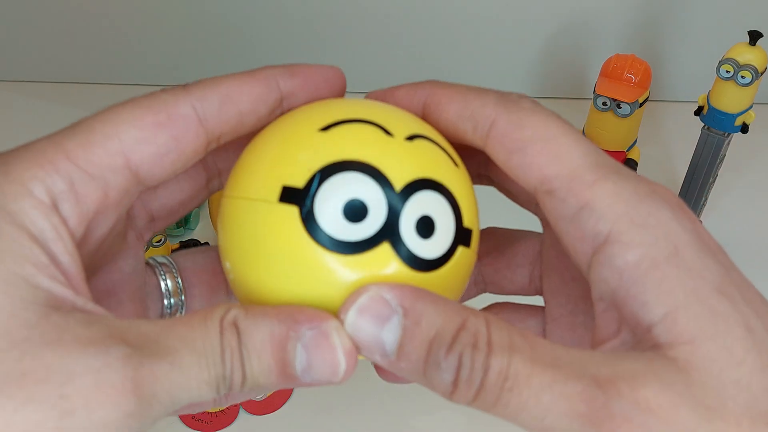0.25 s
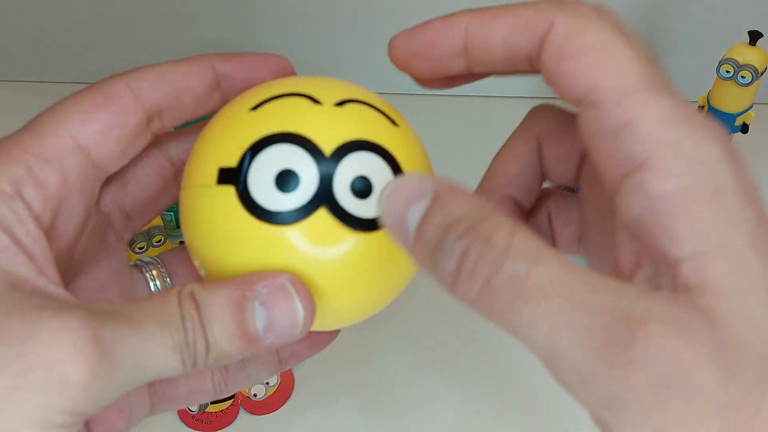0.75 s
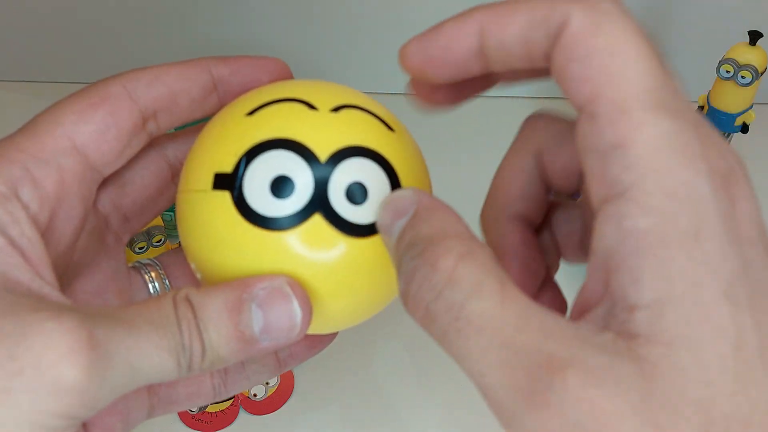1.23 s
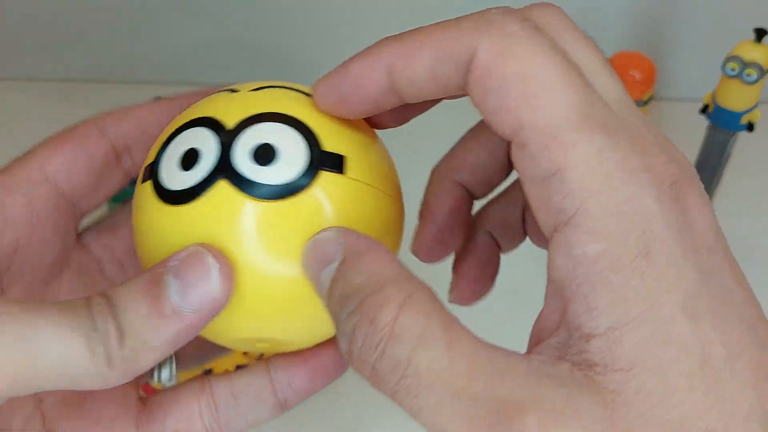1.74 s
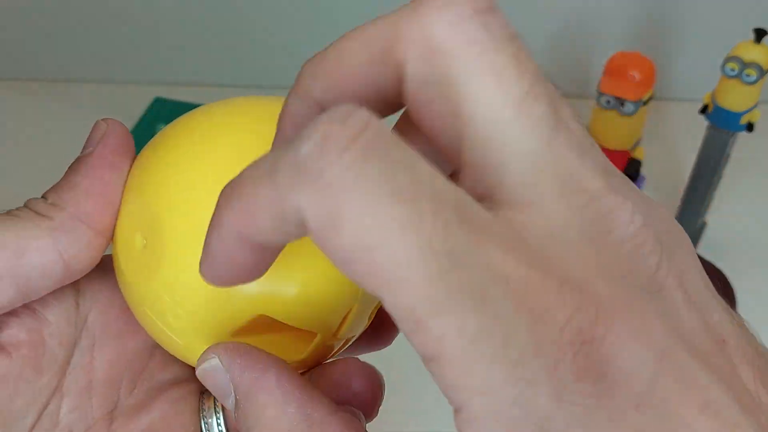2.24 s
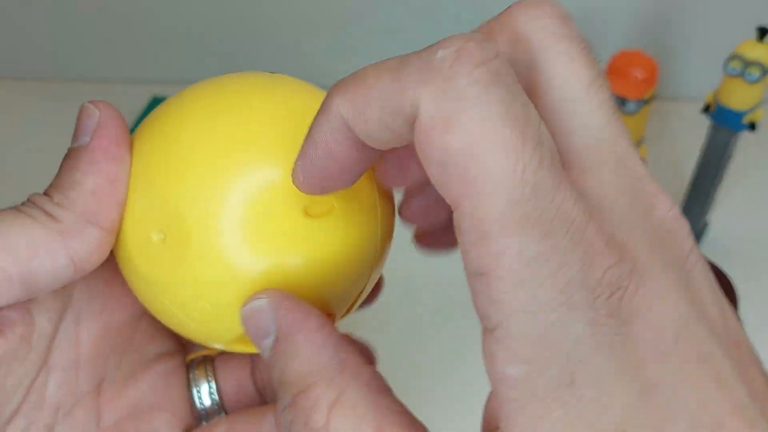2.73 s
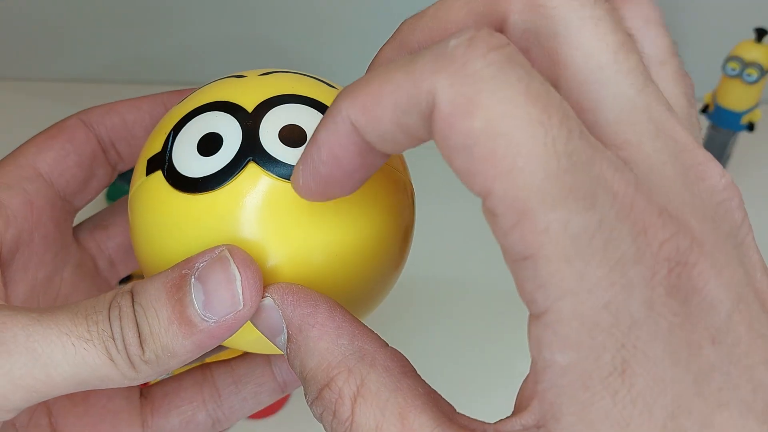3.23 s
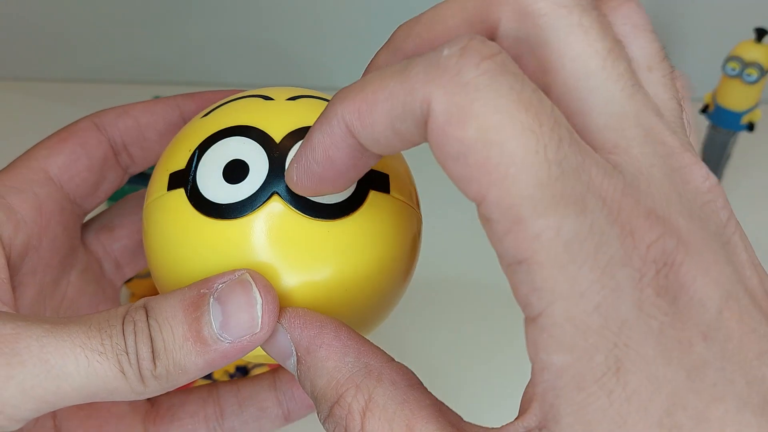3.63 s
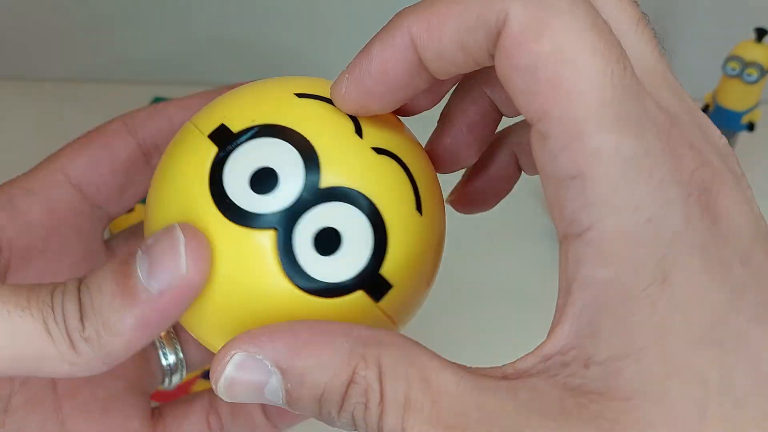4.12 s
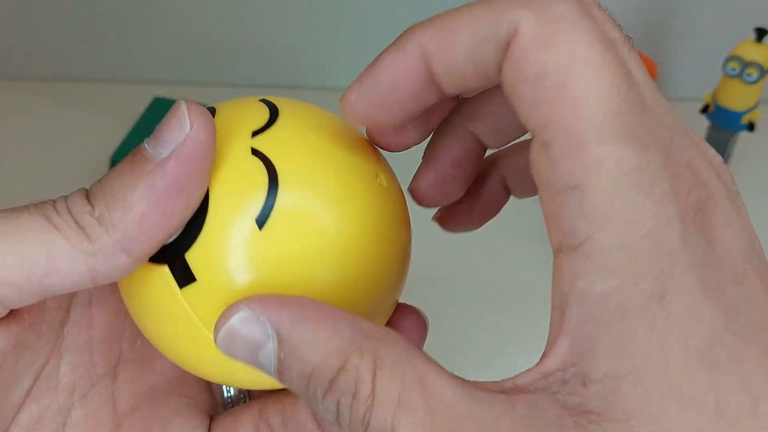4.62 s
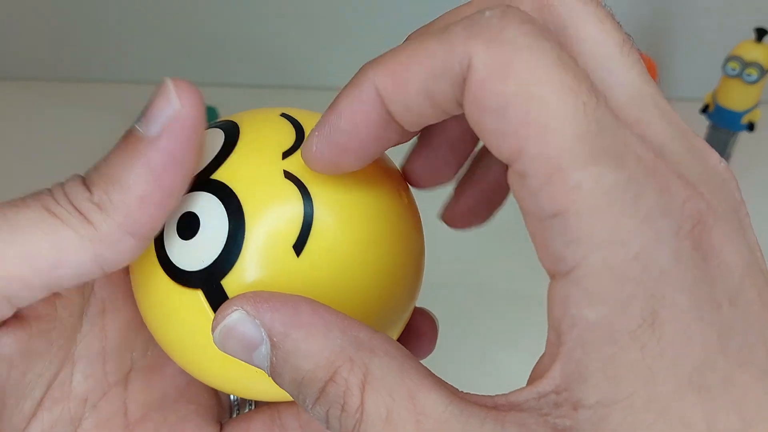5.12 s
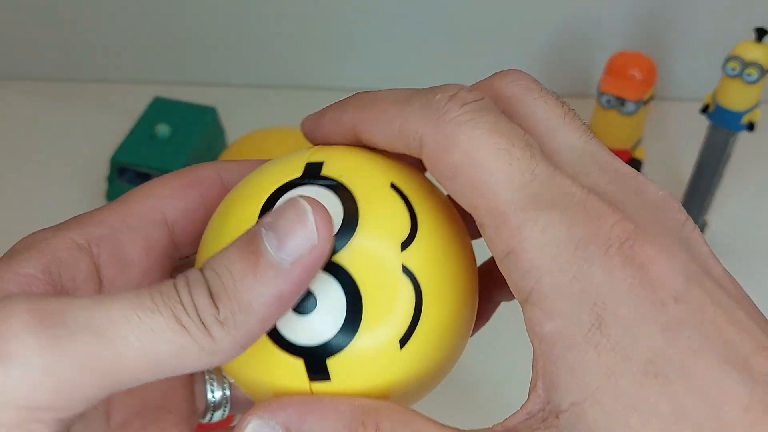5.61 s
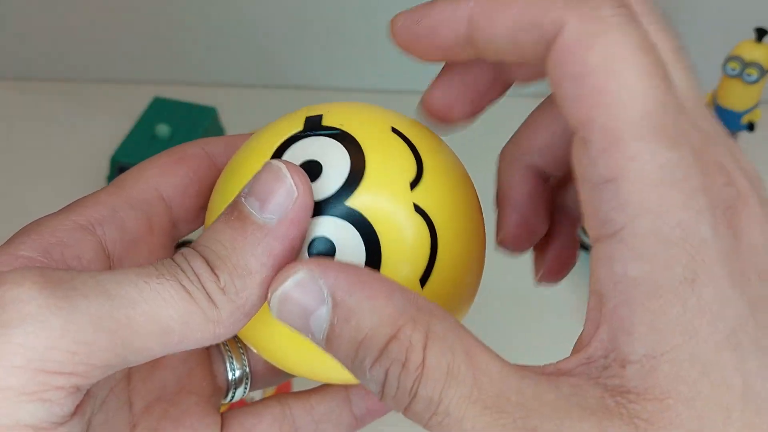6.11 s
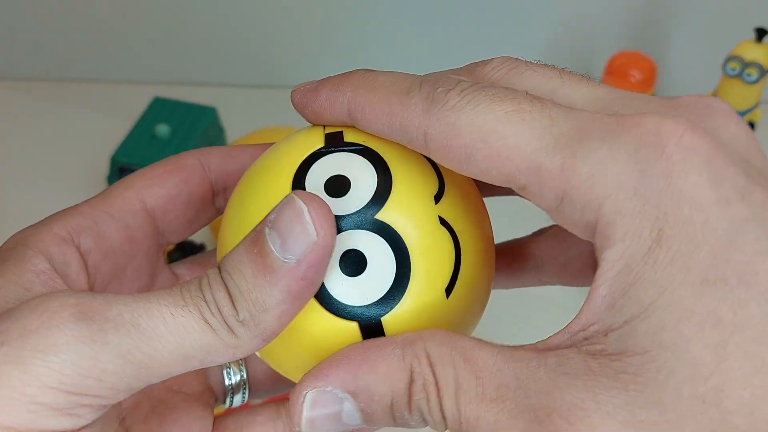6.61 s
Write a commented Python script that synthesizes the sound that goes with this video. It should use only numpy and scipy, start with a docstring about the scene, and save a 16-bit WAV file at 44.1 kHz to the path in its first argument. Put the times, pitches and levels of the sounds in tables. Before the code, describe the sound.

A small, bare indoor room with a steady low hum, slowly beating, and faint air; the microphone is close to hands holding a hollow plastic capsule. A dull fingertip tap and faint scrape at the start, then quiet until four sharp, ringing plastic snaps at about 1.1, 1.3, 1.4 and 1.6 seconds, the first by far the loudest, the fourth softer. A soft tap and skin slide near 2. From 2.3 to 3.9 the rims scrape grittily with a dense, uneven run of smaller clicks and crackles, growing stronger after 3. A firmer snap lands at 4.0, with a dull scrape and skin rubbing to 4.6. Dry, damped knocks come quickly from 4.7 to 5.2, then a skin brush and tap near 5.4. A clearer tap at 6.1, a knock at 6.2, a tap at 6.4 and faint scraping to 6.8. Each click leaves a short room tail.

```python
"""In a small, bare room, two hands twist a hollow plastic toy capsule close to a camera.
Each slip of the seam is a sharp push with chatter: it rings the shell, or knocks dully when fingers damp it.
Fingers tap the shell dully; noise through resonances makes the rims scrape, and coloured noise the skin slide.
The room answers every click and rub with a fading noise tail, and machines hum with a beat under a rush of air.
The camera's limiter holds down the hardest snaps."""
import sys
import numpy as np
from scipy import signal
from scipy.fft import rfft, irfft, next_fast_len
from scipy.io import wavfile
from scipy.ndimage import uniform_filter1d, minimum_filter1d, map_coordinates

SR = 44100
rng = np.random.default_rng(int(sys.argv[2]) if len(sys.argv) > 2 else 0)


def to_wav(s):
    """Save 16-bit WAV."""
    ch = np.atleast_2d(s).T  # columns
    pcm = np.round(np.clip(ch, -1, 1) * 32767)  # PCM
    wavfile.write(sys.argv[1], SR, pcm.astype(np.int16))


N = 302293  # length in samples

# The rush of air, as a tone colour. Each row: frequency in Hz, relative level in dB.
AIR_COLOUR = [(20, -31), (40, -7.5), (62, -8), (85, 0), (130, -0.5), (200, -8.5), (290, -6.5), (420, -20),
              (700, -26.5), (1200, -30.5), (2500, -40.5), (5000, -49), (9000, -43.5), (16000, -53.5)]
# Machine hum; close pairs beat. Each row: frequency in Hz, level in dB.
HUM_TONES = [(57.3, -71), (84.7, -65.5), (115.62, -55.5), (119.88, -57.5), (171.2, -70), (173.4, -66.5),
             (231.3, -72)]

# How slowly the room fades. Each row: frequency in Hz, time to fall by 60 dB in seconds.
ROOM_DECAY = [(200, 0.57), (530, 0.55), (1400, 0.4231), (4000, 0.4466), (8000, 0.47), (15000, 0.28)]
# Tone colour of the room's answer. Each row: frequency in Hz, relative level in dB.
ROOM_COLOUR = [(150, -4), (450, -4.5), (1100, -6.5), (2000, 0.5), (3000, -1.5), (4500, -1), (7000, -3.5),
               (10000, -7.5), (16000, -2)]
# Standing waves of the room. Each entry: frequency in Hz.
ROOM_MODES_HZ = [232, 421, 459, 538.4, 758.5, 882, 926, 1032, 1156, 1280, 1386]
ROOM_MODE_WIDTH_HZ, ROOM_MODE_DB = 18, 6  # shared width, and level against the rest of the answer
WALLS_S, BEFORE_WALLS_DB = 0.027, -1.5  # the answer is weaker until the walls are heard

# Skin slides over the smooth shell. Each row: start in seconds, end in seconds, relative level in dB.
SLIDES = [(0.029, 0.204, -74), (1.988, 2.155, -60), (2.149, 2.312, -67.5), (4.128, 4.281, -59.5),
          (4.369, 4.512, -60.5), (4.547, 4.658, -65.5), (5.23, 5.306, -49.5), (5.616, 5.9, -79),
          (6.286, 6.323, -46)]
# Tone colour of sliding skin. Each row: frequency in Hz, relative level in dB.
SKIN_COLOUR = [(500, 10), (3000, -4), (5000, -3), (7200, 6.5), (9500, 0), (13000, -2), (16000, -4)]
# The rims scrape on each other. Each row: start in seconds, end in seconds, level in dB, brightness in dB.
SCRAPES = [(0.018, 0.173, -62, -33), (0.673, 0.706, -64.5, -32), (2.285, 2.348, -51.5, 0),
           (2.387, 2.449, -56, 3), (2.488, 2.542, -48, 1), (2.542, 2.985, -55.5, -7.5),
           (3.355, 3.468, -48.5, -9.5), (3.506, 3.888, -56.5, -17), (4.095, 4.277, -53, -37),
           (4.396, 4.51, -63, -10.5), (5.375, 5.437, -72, 1), (6.421, 6.489, -69, -17),
           (6.75, 6.843, -66, -19)]
# Resonances that the scraping rims excite. Each row: frequency in Hz, width in Hz, relative level in dB.
RIM_MODES = [(386, 185, 8), (1010, 260, 9.5), (1700, 390, 6), (2820, 520, -2.5), (4500, 1240, 5.5),
             (7800, 1400, -1), (13000, 1800, -8.5)]
# Tiny slips in a scrape: strength relative to it, its scatter, usual pitch, brightness
CRACKLE_DB, CRACKLE_SPREAD_DB, CRACKLE_WALL_HZ, CRACKLE_BRIGHT_DB = -7, 4, 1490, 0.5

# Resonances of the hand-damped capsule. Each row: frequency in Hz, width in Hz, relative level in dB.
SHELL_MODES = [(314, 240, 6.5), (529, 36, 4), (759, 91, 2.5), (1056, 350, 0.5), (1350, 110, -6),
               (1730, 220, -4), (2770, 2100, -10), (3760, 1400, -8.5), (4630, 880, -9.5), (7990, 3300, -6),
               (12600, 1100, -11)]
# The registers thud, shell, crack and tick, in that order. Each row: lowest Hz, highest Hz.
REGISTERS = [(220, 650), (650, 2400), (2400, 6000), (6000, 17000)]
# How each kind of click shares its strength. Each lists: thud, shell, crack and tick, all in dB.
SNAP_VOICE = (-7, -0.5, -6, -6.5)
KNOCK_VOICE = (0.5, -0.5, -8, -7.5)
TAP_VOICE = (-10.5, -1.5, -9, -16)
CRACK_SHARE = 0.55  # brightness lifts the tick fully and the crack by this share
# Fingers and thumb tap the shell. Each row: time in seconds, strength in dB, pitch of the free
# wall in Hz, brightness in dB.
TAPS = [(0.0464, -47, 1375, -22), (0.175, -83.5, 1360, 29), (1.9639, -57.5, 1125, -2),
        (4.558, -58, 1146, -7.5), (5.3669, -38, 1650, 1.5), (5.417, -56.5, 4260, 3), (5.6027, -58, 953, 6),
        (6.1055, -34, 1420, -1.5), (6.4158, -46, 1580, -7), (6.769, -63, 1124, -6)]
# The seam slips while fingers damp the shell. Each row: time in seconds, strength in dB, change
# of the ring left in the shell in dB, brightness in dB.
KNOCKS = [(4.6799, -40.5, -10.5, 0), (4.825, -37, -9, 1), (4.944, -39.5, -17, 3),
          (5.0182, -39.5, -15, -1.5), (5.0866, -34.5, -15, -1.5), (5.1527, -49, -1.5, 19),
          (5.191, -35.5, -7, 6.5), (6.2318, -36, -4, -4)]
# Only a small, stiff patch of wall stays free, another each time: usual pitch, scatter as a log ratio
KNOCK_WALL_HZ, KNOCK_WALL_SCATTER = 6920, 0.24
# The seam slips and the shell rings. Each row: time in seconds, strength in dB, pitch in Hz of the
# wall part that the grip leaves free, extra thud in dB, brightness in dB.
SNAPS = [(1.089, -16, 1280, -8, 1.5), (1.2647, -23, 1600, -3.5, -2), (1.4331, -22.5, 1370, -6.5, -1.5),
         (1.5952, -28, 1089, -4.5, -4), (2.4926, -47, 1590, -7, -7), (2.6001, -55, 1640, 0, 4),
         (2.6301, -53.5, 1610, -6, -2), (2.6658, -47.5, 1540, -6, -2), (2.7094, -42, 1590, 8.5, 0.5),
         (2.7801, -41, 1630, -1, 1.5), (2.9155, -40.5, 975, -3, -7), (3.0414, -36, 935, 3, -4),
         (3.1198, -33.5, 1740, -3, 0.5), (3.1786, -41.5, 927, 0, -6.5), (3.253, -35, 1080, 0.5, -1),
         (3.3025, -53.5, 1039, 15.5, 4), (3.3425, -39, 820, -11, -1.5), (3.3863, -41.5, 1750, -1.5, 1),
         (3.4169, -48, 1670, 2, 3), (3.4857, -32, 1010, 0.5, 0), (3.5751, -39.5, 1726, -6, -2.5),
         (3.671, -32.5, 1090, -1.5, 2.5), (3.7973, -39.5, 1660, -2.5, 2.5), (3.8694, -43.5, 1015, -13, -10),
         (3.8995, -34.5, 1745, 0, 2.5), (4.0432, -27, 935, 0.5, -4)]

PORT_LAG_S = 0.000179  # the right port hears the capsule this much later
CEILING_DB, LOOK_AHEAD_S, HOLD_S = -3.5, 0.001, 0.0071  # the limiter
TOP_HZ = 16300  # the camera's band limit


def amp(db):
    """Turns decibels into a gain."""
    return 10 ** (np.asarray(db) / 20)


def unit(x):
    """Scales a sound to an average (rms) strength of 1."""
    return x / np.sqrt(np.mean(x ** 2) + 1e-30)


def along(points, hz):
    """Reads between (Hz, value) points on a logarithmic frequency axis."""
    f, v = np.transpose(points)
    return np.interp(np.log(hz + 1), np.log(f + 1), v)


def wobble(rate):
    """Draws a smooth random curve with `rate` random points a second."""
    points = rng.standard_normal(int(N * rate / SR) + 4)
    return map_coordinates(points, [np.arange(N) * rate / SR])


def filtered(x, response):
    """Filters x by a response, possibly complex, that depends on frequency."""
    n = x.shape[-1]
    m = next_fast_len(n + 4096, True)  # silence at the end keeps tails from wrapping around
    return irfft(rfft(x, m) * response(np.fft.rfftfreq(m, 1 / SR)), m)[..., :n]


def add(track, sound, s):
    """Mixes a sound into a track from time s in seconds."""
    start = max(round(s * SR), 0)
    part = track[..., start:start + sound.shape[-1]]
    part += sound[..., :part.shape[-1]]


def resonances(modes, hz, contrast=1.314):
    """Power response of damped resonances; contrast deepens the valleys between them."""
    def shape(centre, width):
        return (hz * width) ** 2 / ((centre ** 2 - hz ** 2) ** 2 + (hz * width) ** 2)
    return sum(amp(db) ** 2 * shape(centre, width) ** contrast for centre, width, db in modes)


def causal(power):
    """Gives the response with this power spectrum that rings only after it is struck."""
    cepstrum = irfft(np.log(power + power.max() * 1e-9) / 2)
    half = len(cepstrum) // 2
    # folding the later half onto the earlier one leaves nothing before the blow
    cepstrum[1:half] *= 2
    cepstrum[half + 1:] = 0
    return np.exp(rfft(cepstrum))


def diffuse(pair, spectrum, alike_hz, alike):
    """Makes two noises a sound from all sides: alike at both ports only in the bass."""
    def split(hz):
        likeness = np.clip(alike, 0, 1) / (1 + (hz / alike_hz) ** 4)
        return amp(along(spectrum, hz)) * np.sqrt([1 + likeness, 1 - likeness])
    mid, side = filtered(pair, split)
    return np.array([mid + side, mid - side]) / np.sqrt(2)


def background(air_db=-57, drift=0.051, in_step=0.11):
    """Motor tones of slightly different pitch beat over low air noise; in step at `in_step` seconds."""
    t = np.arange(N) / SR - in_step
    hum = np.zeros(N)
    for hz, db in HUM_TONES:
        phase = 2 * np.pi * hz * t + drift * wobble(1.4)  # drift in radians
        hum += amp(db) * np.sqrt(2) * np.sin(phase)
    air = diffuse(rng.standard_normal((2, N)), AIR_COLOUR, alike_hz=670, alike=0.69)
    return hum + amp(air_db) * unit(air)


def standing_waves(hz):
    """Gain of the room's answer: it peaks at each standing wave."""
    modes = [(centre, ROOM_MODE_WIDTH_HZ, ROOM_MODE_DB) for centre in ROOM_MODES_HZ]
    return np.sqrt(1 + resonances(modes, hz))


def room_tail(build=0.0066, sparse=0.035, lumpy_db=4):
    """A fresh room answer: uneven reflections first, then a smoother decay, each pitch at its own rate."""
    noise = filtered(rng.standard_normal((2, int(0.5 * SR))), standing_waves)
    hz, t, z = signal.stft(noise, SR, nperseg=256)
    fade = amp(-60 * t / along(ROOM_DECAY, hz)[:, None])
    tail = signal.istft(z * fade, SR, nperseg=256)[1]
    t = np.arange(tail.shape[1]) / SR
    # random spikes stand for single reflections and even out over `sparse` seconds
    spikes = amp(lumpy_db * np.exp(-t / sparse) * rng.standard_normal(tail.shape))
    rise = 1 - np.exp(-(t / build) ** 2)
    tail = tail * spikes * rise * amp(BEFORE_WALLS_DB * (t < WALLS_S))
    return diffuse(unit(tail) / np.sqrt(len(t)), ROOM_COLOUR, alike_hz=620, alike=1.0)


def ports(x, left_db):
    """The capsule is nearer the left port: treble rises there, falls at the right and arrives later."""
    def sides(hz):
        shade_db = left_db * hz ** 2 / (hz ** 2 + 500 ** 2)
        late = np.exp(-2j * np.pi * hz * PORT_LAG_S)
        return np.array([amp(shade_db), amp(-shade_db) * late])
    return filtered(x, sides)


def stroke(start, end, ease=0.24):
    """Pressure of one stroke: it swells and fades, reaching slightly past both ends."""
    u = (np.arange(N) / SR - start) / (end - start)
    return np.clip(np.minimum(u, 1 - u) / (2 * ease) + 0.26, 0, 1)


def friction(grain_rate, grain_db, waver_db):
    """Force of a sliding surface: tiny catches, clumped into grains under an unsteady pressure."""
    return rng.standard_normal(N) * amp(grain_db * wobble(grain_rate) + waver_db * wobble(45))


def skin_slides(slide_db=-6.0):
    """Fingers hiss over the plastic: fine-grained friction noise with the colour of skin."""
    force = friction(grain_rate=1800, grain_db=1.0, waver_db=3.0)
    hiss = unit(filtered(force, lambda hz: amp(along(SKIN_COLOUR, hz))))
    return amp(slide_db) * hiss * sum(stroke(a, b) * amp(db) for a, b, db in SLIDES)


def rim_scrapes(bright_hz=2800):
    """Coarse friction excites the rims; each scrape has its own share of treble."""
    force = friction(grain_rate=500, grain_db=3.5, waver_db=2.0)
    grit = unit(filtered(force, lambda hz: np.sqrt(resonances(RIM_MODES, hz))))
    treble = filtered(grit, lambda hz: 1 / (1 + (bright_hz / (hz + 1)) ** 6))
    rims = np.zeros(N)
    for start, end, db, bright_db in SCRAPES:
        rims += stroke(start, end) * amp(db) * (grit + (amp(bright_db) - 1) * treble)
    return rims


def rubbing(room_db=-5):
    """Scraping rims and sliding fingers, heard directly and through the room."""
    sound = rim_scrapes() + skin_slides()
    room = signal.fftconvolve(sound[None], room_tail(), axes=1)[:, :N]
    return ports(sound, left_db=4.5) + amp(room_db) * room


def crackle(count=36, pitch_scatter=0.45):
    """Tiny slips at uneven steps while the rims scrape, as rows like those of the snaps."""
    start, end, scrape_db, _ = np.transpose(SCRAPES)
    travel = np.cumsum(end - start)  # scraping time so far, pauses left out
    places = travel[-1] * (np.arange(count) + rng.random(count)) / count
    rows = []
    for place in places:
        k = np.searchsorted(travel, place)  # the scrape that holds this slip
        size, pitch = rng.standard_normal(2)
        s = end[k] - (travel[k] - place)
        db = scrape_db[k] + CRACKLE_DB + CRACKLE_SPREAD_DB * size
        wall_hz = CRACKLE_WALL_HZ * np.exp(pitch_scatter * pitch)
        rows.append((s, db, wall_hz, 0, CRACKLE_BRIGHT_DB))
    return rows


def registers(voice, db, bright_db, thud_db=0, ring_db=0):
    """Levels of thud, shell, crack and tick for one click."""
    return db + np.array(voice) + np.array([thud_db, ring_db, CRACK_SHARE * bright_db, bright_db])


def voiced(force, levels, wall_hz, wall_db=4, wall_q=4.5, soft_hz=7800, soft_slope=1.3):
    """The shell rings to a force; the grip sets each register's level, a mean over 10 ms."""
    blow = rfft(force)
    hz = np.fft.rfftfreq(force.shape[-1], 1 / SR) + 1
    power = resonances(SHELL_MODES + [(wall_hz, wall_hz / wall_q, wall_db)], hz)
    # a soft click, with less tick than crack, keeps losing treble octave by octave
    *_, crack_db, tick_db = levels
    softness_db = soft_slope * min(tick_db - crack_db, 0)
    power = power * amp(softness_db * np.log2(1 + (hz / soft_hz) ** 4) / 4) ** 2
    colour = 0
    for db, (low, high) in zip(levels, REGISTERS):
        part = power / (1 + (low / hz) ** 10) / (1 + (hz / high) ** 10)
        colour = colour + amp(db) ** 2 * part / np.mean(part * np.abs(blow) ** 2)
    return irfft(blow * causal(colour)) * np.sqrt(0.01 * SR)


def click(levels, wall_hz, lead=0.0037, chatter=1.68, chatter_life=0.0026, chatter_hz=1200,
          creep=0.64, creep_life=0.00093, apart=1.0, to_room=0.15):
    """Faint creeping, a sharp push, then chatter to rest: near sound, room feed, lead seconds."""
    t = (np.arange(2048) - round(lead * SR)) / SR
    push = 1.0 * (t == 0)
    before = creep * np.exp(-np.abs(t) / creep_life)
    after = np.exp(-np.abs(t) / chatter_life)
    rattle = unit(np.where(t < 0, before, after)) / np.sqrt(len(t))
    # each port faces another part of the shell, so the chatter differs between them
    shared, separate = rng.standard_normal(len(t)), rng.standard_normal((2, len(t)))
    catches = chatter * rattle * (shared + apart * separate)
    # the catches are too brief to move the whole capsule: its thud comes from the push
    catches = filtered(catches, lambda hz: 1j * hz / (chatter_hz + 1j * hz))
    near = voiced(push + catches, levels, wall_hz)
    # the room gathers all directions, which evens the chatter out
    feed = voiced(push + to_room * catches.mean(0), levels, wall_hz)
    return near, feed, lead


def clicks(rows, room_db, room_delay=0.002):
    """Places clicks (seconds, register levels, wall Hz), each with its own answer from the room."""
    near, room = np.zeros((2, N)), np.zeros((2, N))
    for s, levels, wall_hz in rows:
        sound, feed, lead = click(levels, wall_hz)
        add(near, sound, s - lead)
        answer = signal.fftconvolve(feed[None], room_tail(), axes=1)
        add(room, answer, s - lead + room_delay)
    return ports(near, left_db=1.76) + amp(room_db) * room


def tapping():
    """Fingertips touch the shell: dull taps with little tick."""
    rows = [(s, registers(TAP_VOICE, db, bright), hz) for s, db, hz, bright in TAPS]
    return clicks(rows, room_db=-3.5)


def knocking():
    """Fingers damp the shell's ring, so a slip gives a dead knock from a small free patch of wall."""
    rows = []
    for s, db, ring, bright in KNOCKS:
        wall_hz = KNOCK_WALL_HZ * np.exp(KNOCK_WALL_SCATTER * rng.standard_normal())
        rows.append((s, registers(KNOCK_VOICE, db, bright, ring_db=ring), wall_hz))
    return clicks(rows, room_db=-3.5)


def snapping():
    """The seam slips and rings the free shell; the crackle of the scrapes works the same way."""
    rows = []
    for s, db, wall_hz, thud, bright in SNAPS + crackle():
        rows.append((s, registers(SNAP_VOICE, db, bright, thud_db=thud), wall_hz))
    return clicks(rows, room_db=-5.5)


def scene():
    """The room's background, then the capsule in the hands."""
    return background() + rubbing() + tapping() + knocking() + snapping()


def limiter(x):
    """Turns both channels down for a moment when a peak would pass the ceiling."""
    needed = np.minimum(1, amp(CEILING_DB) / (np.abs(x).max(0) + 1e-9))
    ahead, hold = max(round(LOOK_AHEAD_S * SR), 1), max(round(HOLD_S * SR), 1)
    held = minimum_filter1d(needed, ahead + hold, origin=(hold - 1) // 2)
    return x * uniform_filter1d(held, ahead)


def record(dry):
    """The camera limits the peaks and cuts steeply above its band limit."""
    return filtered(limiter(dry), lambda hz: 1 / np.sqrt(1 + (hz / TOP_HZ) ** 160))


dry = scene()
out = record(dry)
to_wav(out)
```